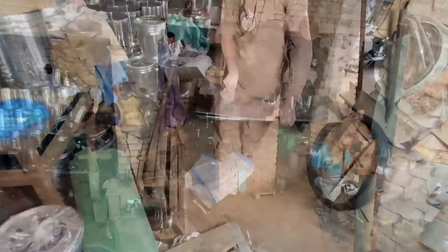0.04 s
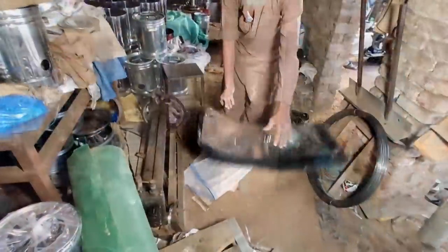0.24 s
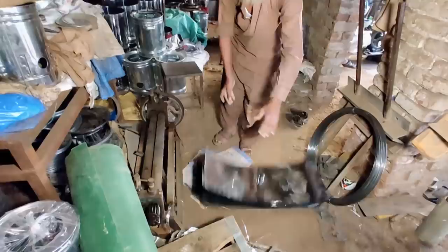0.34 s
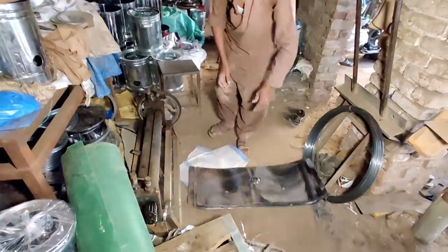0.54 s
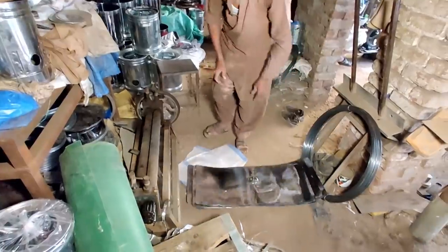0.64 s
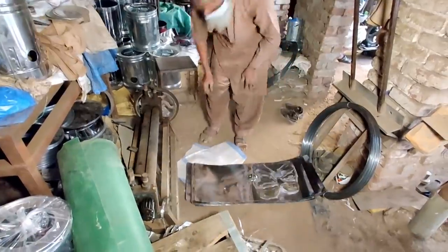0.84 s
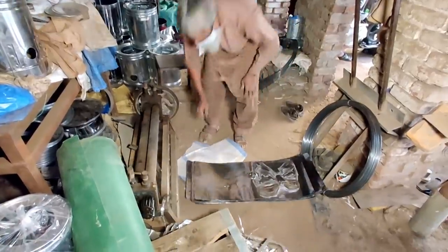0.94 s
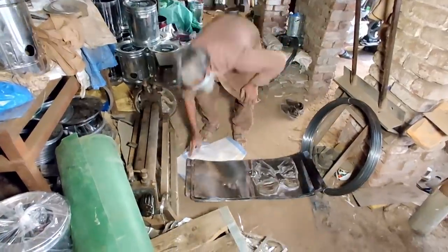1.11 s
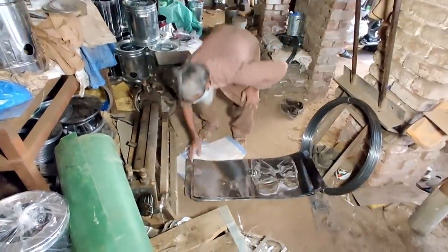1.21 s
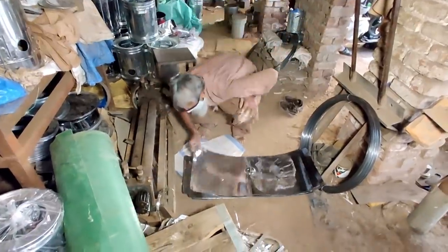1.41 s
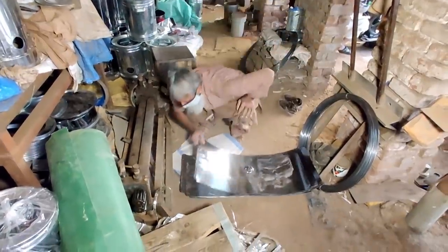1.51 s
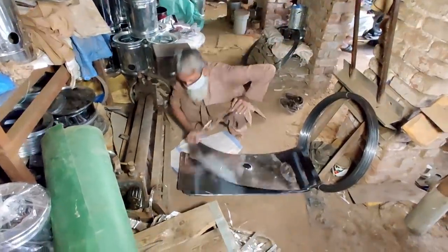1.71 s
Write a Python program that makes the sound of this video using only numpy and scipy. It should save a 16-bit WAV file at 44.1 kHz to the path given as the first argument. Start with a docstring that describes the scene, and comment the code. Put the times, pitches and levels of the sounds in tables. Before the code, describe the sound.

A thin metal sheet slides, buckles and crashes onto a dirt floor with a thud. After a short pause it clangs, clatters and rings briefly, ending in a light scrape. A faint workshop hum lies underneath, all on the right.

```python
"""A brief rustle opens the scene. A thin metal sheet buckles as it is let go, crashes onto a dirt floor with a
thud and rattles to rest, each tiny contact exciting its dense modes. After a small snap, as a man bends down to
it, metal clangs, clatters, wobbles and squeals; the knocks set clear modes ringing until they are damped. Grit
scuffs and a light scrape follows. Under it all lies the low hum of a small workshop, and the scene is heard
almost wholly in the right channel."""
import sys
import numpy as np
from scipy import signal
from scipy.fft import rfft, irfft
from scipy.io import wavfile

SR = 44100
rng = np.random.default_rng(int(sys.argv[2]) if len(sys.argv) > 2 else 0)


def digitize_waveform(pressure):
    """Quantize a signal to 16-bit integers and store it at the path in sys.argv[1].

    Rows of a 2-D input are taken as channels; values are limited to [-1, 1].
    """
    field = np.atleast_2d(pressure).T
    bounded = np.clip(field, -1, 1)
    quanta = np.round(bounded * 32767).astype(np.int16)
    wavfile.write(sys.argv[1], SR, quanta)


N = 77175
TIME = np.arange(N) / SR

# Decay of the sheet's dense modes: (frequency [Hz], t60 [s])
SHEET_DECAY = [(200, 0.85), (700, 0.45), (1500, 0.25), (4000, 0.29), (8000, 0.16), (16000, 0.25)]
def sheet(drive, shimmer_db=-5, build_s=0.00058, size=256):
    """High modal density: each contact is heard directly and as a noise-like tail of close modes."""
    hz, t, spectrum = signal.stft(rng.standard_normal(SR), SR, nperseg=size)
    decay = amp(-60 * t / read(SHEET_DECAY, hz)[:, None])
    tail = signal.istft(spectrum * decay, SR, nperseg=size)[1]
    tail *= 1 - np.exp(-np.arange(len(tail)) / SR / build_s)
    shimmer = signal.fftconvolve(drive, tail / np.linalg.norm(tail))[:N]
    return (drive + amp(shimmer_db) * shimmer) / np.hypot(1, amp(shimmer_db))


# Rustling, buckling, crashing: (start [s], rise [s], hold [s], t60 [s], level [dB], treble gain [dB])
RUSTLE_BURSTS = [(0.0, 0.00057, 0.0056, 0.16, -40.5, 1), (0.033, 0.0074, 0.017, 0.12, -41.5, -2),
                 (0.985, 0.011, 0.043, 0.2, -52, -10)]
BUCKLE_BURSTS = [(0.14, 0.0012, 0.019, 0.82, -46, 4.5), (0.175, 0.022, 0.038, 0.47, -34, -3),
                 (0.27, 0.032, 0.058, 0.79, -33, -2), (0.395, 0.0047, 0.0035, 0.085, -28.5, 2),
                 (0.55, 0.066, 0.013, 0.1, -34, 0), (0.72, 0.049, 0.098, 0.52, -59, 10)]
CRASH_BURSTS = [(0.397, 0.03, 0.022, 0.14, -28.5, 5), (0.44, 0.029, 0.019, 0.62, -29, -8.5),
                (0.52, 0.023, 0.035, 0.19, -33.5, -32)]
# Their spectra: (frequency [Hz], relative level [dB])
RUSTLE_SPECTRUM = [(150, -3), (700, -18), (1100, -10.5), (1560, 1.5), (3000, -9.5), (3850, -5.5),
                   (5600, -8.5), (6900, -3.5), (7700, -8), (8600, -1.5), (10000, -19.5), (16000, -19)]
BUCKLE_SPECTRUM = [(60, -33.5), (200, -19), (430, -22.5), (560, -8.5), (690, -1), (900, -5), (1140, -3.5),
                   (1400, -6.5), (2700, -11), (4700, -24), (8500, -21.5), (10500, -37), (16000, -32)]
CRASH_SPECTRUM = [(100, -21), (400, -12), (650, -15), (1200, 0), (1900, 2.5), (2450, 0), (2950, 1),
                  (4000, -1), (5200, -6), (6800, -7), (7600, -2), (8700, -5), (10000, -19.5), (16000, -21)]
def fall():
    """Impulsive excitation: friction, buckling and the crash each give swarms of tiny impulses."""
    slide = rattle(RUSTLE_BURSTS, RUSTLE_SPECTRUM)
    buckle = rattle(BUCKLE_BURSTS, BUCKLE_SPECTRUM)
    crash = rattle(CRASH_BURSTS, CRASH_SPECTRUM)
    return slide + buckle + crash


# Blows of metal on metal: (time [s], relative crack level [dB], relative ring level [dB])
KNOCK_STRIKES = [(1.1483, 5, -16), (1.1557, 0, -23), (1.195, -8, 0.5), (1.201, 0.5, 0.5), (1.333, -15, 0.5),
                 (1.3545, -18, 1.5), (1.379, -28, -6), (1.426, -40, -12), (1.457, -32, -34)]
# Spectrum of a crack: (frequency [Hz], relative level [dB])
CRACK_SPECTRUM = [(100, -58), (400, -9), (750, -1), (1800, 4.5), (2800, -8.5), (5000, -29), (9000, -46),
                  (16000, -40)]
def knocks(gain_db=-4):
    """Hard impact: a very brief contact gives a broadband crack."""
    times, crack_db, _ = np.transpose(KNOCK_STRIKES)
    return colour(clicks(times, crack_db + gain_db), CRACK_SPECTRUM)


# Clear modes of the metal: (frequency [Hz], level for a 0 dB knock [dB], t60 [s])
RING_MODES = [(614, -43, .42), (662, -50, .8), (786, -48, .35), (848, -47, .35), (963, -45, .5),
              (1027, -45, .35), (1098, -38.5, .38), (1181, -42, .3), (1307, -29.7, .6), (1360, -41, .2),
              (1505, -39, .25), (1598, -42, .26), (1732, -40, .27), (1820, -42, .18), (2055, -44, .24),
              (2353, -47, .25), (2588, -40.5, .3), (3012, -46, .2), (4409, -50, .26), (4590, -51, .22),
              (4904, -53, .25)]
def ring(waver_hz=2.01, waver_db=1.8, waver_rate_hz=15.5, damp_start_s=1.518, damp_db_per_s=170):
    """Free vibration: modes store the knocks' energy, waver as the metal bends and are then damped."""
    times, _, ring_db = np.transpose(KNOCK_STRIKES)
    energy_in = clicks(times, ring_db) ** 2
    out = np.zeros(N)
    for hz, db, t60 in RING_MODES:
        energy = signal.lfilter([1], [1, -amp(-60 / t60 / SR) ** 2], energy_in)
        cycles = np.cumsum(hz + waver_hz * drift(waver_rate_hz)) / SR + rng.random()
        gain = amp(db + waver_db * drift(waver_rate_hz))
        out += np.sqrt(energy) * gain * np.sin(2 * np.pi * cycles)
    return out * amp(-damp_db_per_s * np.maximum(TIME - damp_start_s, 0))


# Clatter, grit, scrapes: (start [s], rise [s], hold [s], t60 [s], level [dB], treble gain [dB])
CLATTER_BURSTS = [(1.139, 0.0042, .002, 0.055, -56, -29), (1.148, 0.0031, 0.032, 0.27, -27, 3),
                  (1.185, 0.031, 0.022, 0.33, -31.5, 3), (1.265, 0.047, 0.019, 0.38, -32, 0.5),
                  (1.345, 0.016, 0.035, 0.15, -35.5, -0.5)]
GRIT_BURSTS = [(1.481, 0.0018, 0.0028, 0.045, -63, 11), (1.497, 0.0012, 0.0026, 0.028, -54.5, 8.5),
               (1.533, 0.0013, 0.0036, 0.17, -47.5, -1)]
SCRAPE_BURSTS = [(1.598, 0.0066, 0.0082, 0.11, -50, -25), (1.655, 0.013, 0.047, 0.21, -48.5, 0.5)]
# Their spectra: (frequency [Hz], relative level [dB])
CLATTER_SPECTRUM = [(100, -41), (210, -27.5), (300, -16.5), (550, -9), (900, -5.5), (1250, -4),
                    (1900, -3.5), (2600, -14.5), (3600, -16), (4600, -16.5), (7000, -20), (8000, -15.5),
                    (10200, -30), (16000, -25.5)]
GRIT_SPECTRUM = [(200, -18), (1500, 7), (3500, 2), (6000, -5), (8500, 6.5), (10500, -15), (16000, -2)]
SCRAPE_SPECTRUM = [(100, -8), (400, -3.5), (700, 1.5), (860, -1.5), (970, 5.5), (1100, -3.5), (2250, -7),
                   (2440, 0), (2900, -14.5), (8500, -23), (10500, -34), (16000, -39)]
def clatter_and_scrape():
    """Intermittent contact: metal clatters, grit scuffs and light scrapes follow."""
    clatter = rattle(CLATTER_BURSTS, CLATTER_SPECTRUM)
    grit = rattle(GRIT_BURSTS, GRIT_SPECTRUM)
    scrape = rattle(SCRAPE_BURSTS, SCRAPE_SPECTRUM)
    return clatter + grit + scrape


# Flat blows on the dirt: (start [s], rise [s], hold [s], t60 [s], level [dB])
THUD_BURSTS = [(0.401, 0.0054, 0.0032, 0.056, -24), (0.439, .008, 0.0077, 0.1, -48),
               (1.35, 0.031, 0.031, 0.27, -43)]
# Their spectrum: (frequency [Hz], relative level [dB])
THUD_SPECTRUM = [(20, -1), (90, 2.5), (160, 1), (300, 5.5), (420, -7), (550, 10.5), (1000, -13),
                 (2000, -5.5), (16000, -39)]
def thuds():
    """Soft impact: the sheet's blows on dirt give mostly low frequencies."""
    return noise_bursts(THUD_BURSTS, THUD_SPECTRUM)


# Squeals of the edge: (start [s], rise [s], hold [s], t60 [s], level [dB])
SQUEAL_BURSTS = [(1.288, .008, .025, .2, -43.5), (1.37, .01, .02, .25, -52)]
def squeal():
    """Frictional vibration: the sliding edge sounds a high, unsteady tone."""
    return narrowband(SQUEAL_BURSTS, hz=7950, width_hz=75)


# Wobble of the sheet: (start [s], rise [s], hold [s], t60 [s], level [dB])
WOBBLE_BURSTS = [(1.17, .07, .04, .12, -51)]
def wobble():
    """Flexural vibration: the wobbling sheet sounds a low note."""
    return narrowband(WOBBLE_BURSTS, hz=133, width_hz=9.3)


# One snap in the pause: (start [s], rise [s], hold [s], t60 [s], level [dB])
SNAP_BURSTS = [(0.9695, 0.00086, 0.0014, 0.036, -52.5)]
# Its spectrum: (frequency [Hz], relative level [dB])
SNAP_SPECTRUM = [(1500, -5), (3500, -9), (5600, 2), (7200, -10), (10000, -24)]
def snap():
    """Transient: bright noise with an abrupt onset is heard as a snap."""
    return noise_bursts(SNAP_BURSTS, SNAP_SPECTRUM)


# Workshop background: (frequency [Hz], relative level [dB])
ROOM_SPECTRUM = [(20, 3.5), (50, -5.5), (170, -10.5), (350, -22), (1500, -20), (4000, -38), (8500, -33.5),
                 (10500, -45.5), (16000, -45)]
def workshop(hum_hz=80.5, hum_db=-53.5, swell_s=0.74, noise_db=-53.5):
    """Superposition: a machine's low hum swells in over steady broadband noise."""
    hum = np.sqrt(2) * np.sin(2 * np.pi * (hum_hz * TIME + rng.random()))
    swell = np.minimum(TIME / swell_s, 1)
    return amp(hum_db) * hum * swell + amp(noise_db) * colour(rng.standard_normal(N), ROOM_SPECTRUM)


def rattle(bursts, spectrum, contacts_per_s=4500, spread_db=1.5, treble_hz=3130):
    """Shot noise: swarms of tiny uneven contacts; each swarm has its own share of treble."""
    low_pass = signal.butter(2, treble_hz, fs=SR, output="sos")
    out = np.zeros(N)
    for *shape, treble_db in bursts:
        strength = amp(spread_db * np.minimum(rng.exponential(1, N), 3)) * rng.choice([-1, 1], N)
        touching = rng.random(N) < contacts_per_s / SR
        train = unit_rms(strength * touching) * envelope(*shape)
        soft = signal.sosfiltfilt(low_pass, train)
        out += soft + amp(treble_db) * (train - soft)
    return colour(out, spectrum)


def noise_bursts(bursts, spectrum):
    """Source and filter: white noise is shaped in time, then in frequency."""
    return colour(rng.standard_normal(N) * sum(envelope(*row) for row in bursts), spectrum)


def narrowband(bursts, hz, width_hz):
    """Random modulation widens a tone into a narrow band, which swells and dies."""
    carrier = np.exp(2j * np.pi * hz * TIME)
    modulation = drift(width_hz) + 1j * drift(width_hz)
    return sum(envelope(*row) for row in bursts) * (carrier * modulation).real


def amp(db):
    """Decibels to amplitude ratio."""
    return 10 ** (np.asarray(db) / 20)


def unit_rms(x):
    """Normalisation to rms 1."""
    return x / np.sqrt(np.mean(x ** 2) + 1e-20)


def read(points, hz):
    """Interpolation on a log-frequency axis."""
    f, value = np.transpose(points)
    return np.interp(np.log(hz + 1), np.log(f + 1), value)


def colour(x, spectrum, size=4096):
    """Minimum-phase filter of unit energy with the given spectral shape."""
    log_gain = np.log(amp(read(spectrum, abs(np.fft.fftfreq(size, 1 / SR)))))
    response = np.exp(np.conj(signal.hilbert(log_gain)))
    taps = np.fft.ifft(response).real[:size // 2]
    return signal.fftconvolve(x, taps / np.linalg.norm(taps))[:N]


def drift(rate_hz):
    """Low-pass noise: a smooth fluctuation of rms 1."""
    low_pass = np.exp(-(np.fft.rfftfreq(N, 1 / SR) / rate_hz) ** 2)
    return unit_rms(irfft(rfft(rng.standard_normal(N)) * low_pass, N))


def envelope(start, rise, hold, t60, db):
    """Linear rise, hold and exponential decay."""
    t = TIME - start
    return amp(db - 60 * np.maximum(t - rise - hold, 0) / t60) * np.clip(t / rise, 0, 1)


def clicks(times, levels_db):
    """One impulse at each time."""
    out = np.zeros(N)
    out[np.round(times * SR).astype(int)] = amp(levels_db)
    return out


def duck_bass(x, bass_hz=106, threshold_db=-32.5, slope=0.92, recover_db_per_s=53, size=600):
    """Compression: the recorder turns the deep bass down while the sound is loud."""
    power_db = 10 * np.log10(abs(signal.lfilter(np.ones(size) / size, [1], x ** 2)) + 1e-12)
    release_db = recover_db_per_s * TIME
    held_db = np.maximum.accumulate(power_db + release_db) - release_db
    over_db = np.maximum(held_db - threshold_db, 0)
    bass = signal.sosfiltfilt(signal.butter(3, bass_hz, fs=SR, output="sos"), x)
    return x - bass * (1 - amp(-slope * over_db))


def scene():
    """Superposition: the drop, the clang and the workshop add at the microphone."""
    drop = thuds() + sheet(fall())
    clang = snap() + sheet(knocks() + clatter_and_scrape()) + squeal() + wobble() + ring()
    return np.tile(drop + clang + workshop(), (2, 1))


# Self-noise of the left channel: (frequency [Hz], relative level [dB])
HISS_SPECTRUM = [(20, 6), (60, -12.5), (200, -21.5), (1200, -29.5), (4500, -36), (6200, -50), (11000, -36),
                 (16000, -34)]
def record(dry, left_gain_db=-45, hiss_db=-64.5, cutoff_hz=16000):
    """Channel imbalance: the left is nearly dead, the right has its bass ducked; both are band-limited."""
    left = amp(left_gain_db) * dry[0] + amp(hiss_db) * colour(rng.standard_normal(N), HISS_SPECTRUM)
    right = duck_bass(dry[1])
    low_pass = signal.firwin(511, cutoff_hz, window=("kaiser", 9), fs=SR)
    return signal.oaconvolve(np.array([left, right]), low_pass[None], "same", axes=1)


dry = scene()
out = record(dry)
digitize_waveform(out)
```